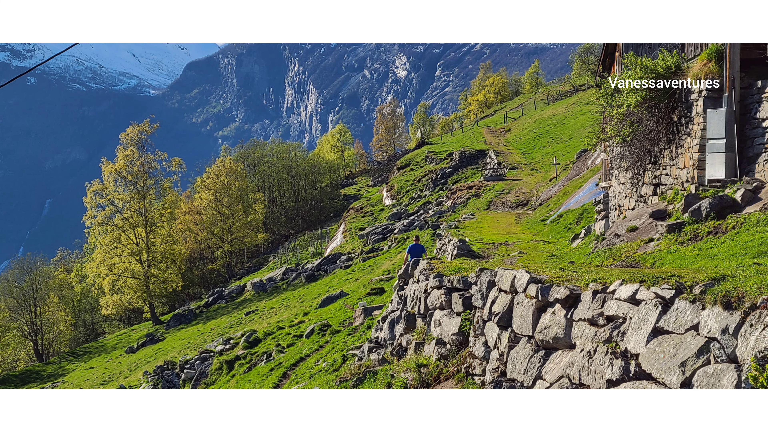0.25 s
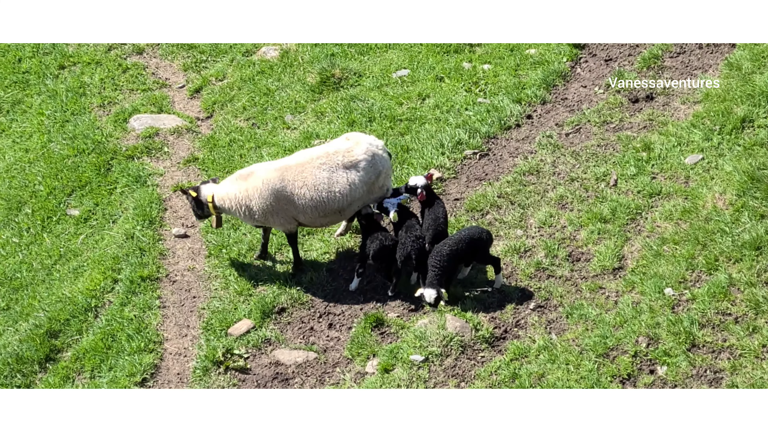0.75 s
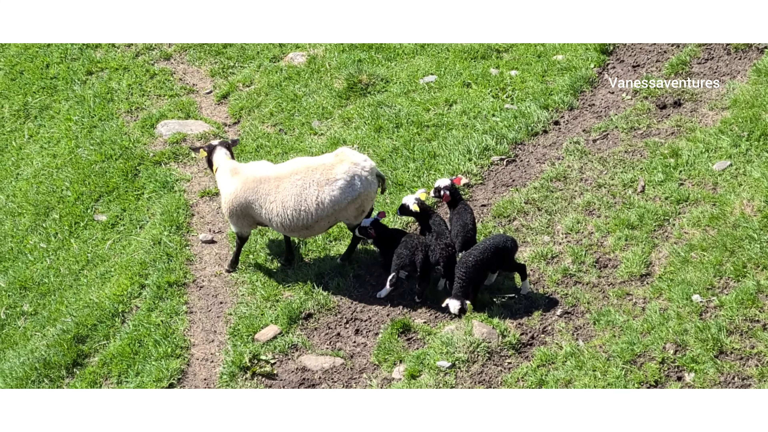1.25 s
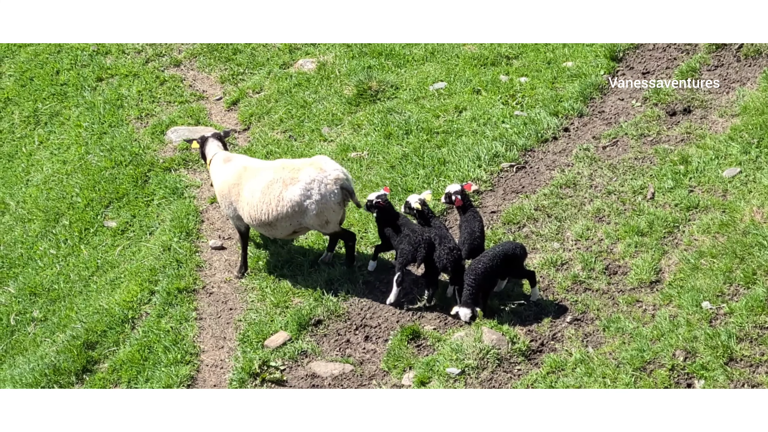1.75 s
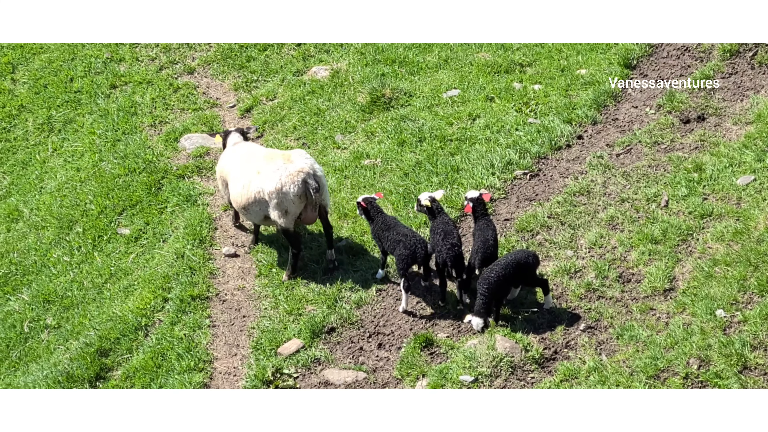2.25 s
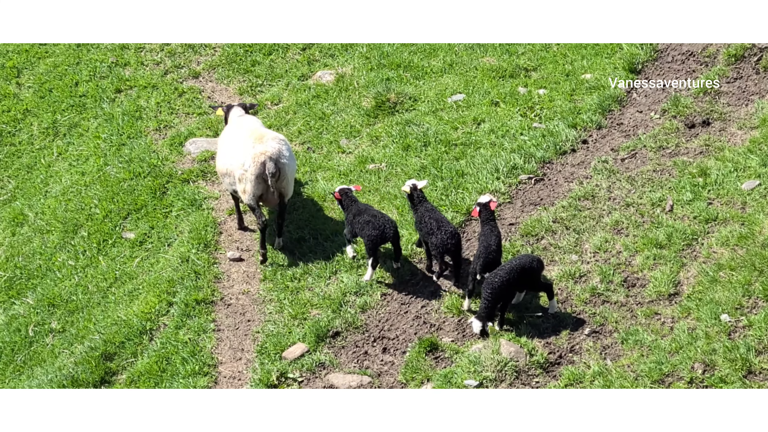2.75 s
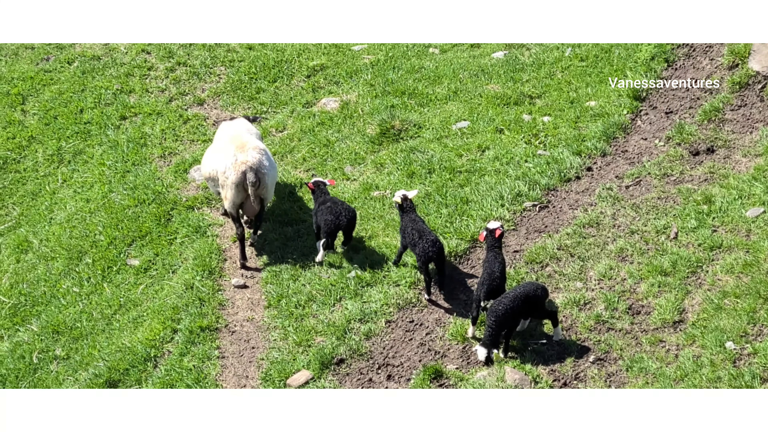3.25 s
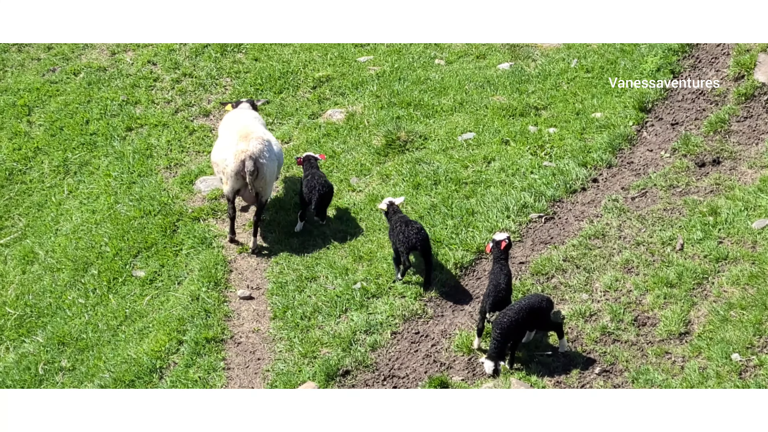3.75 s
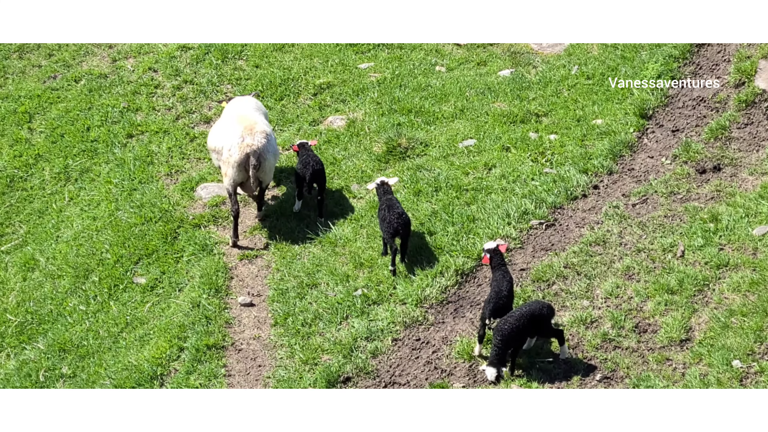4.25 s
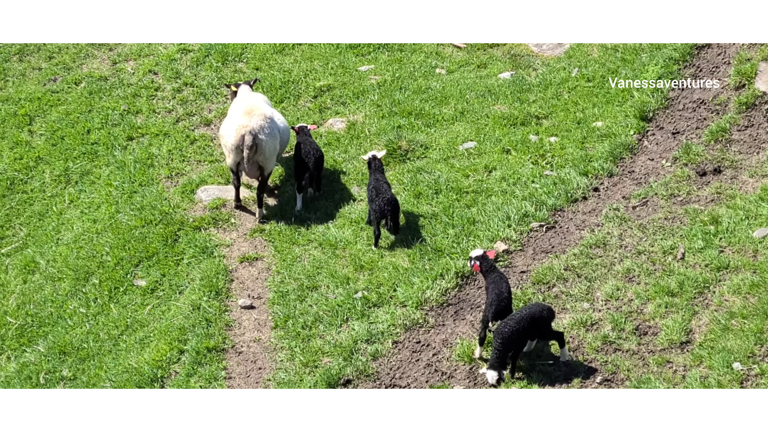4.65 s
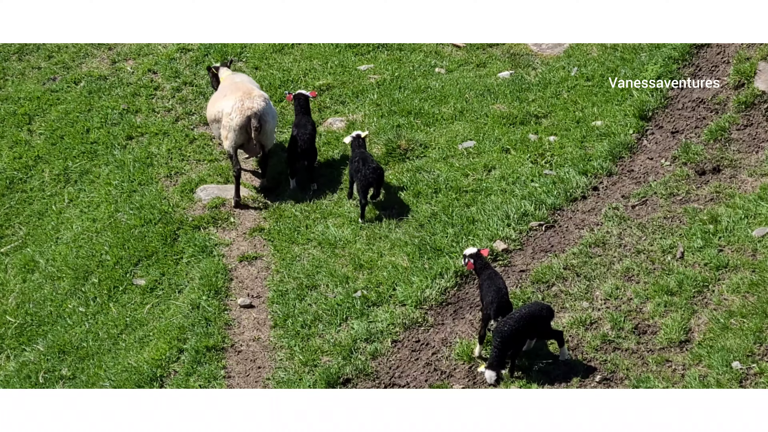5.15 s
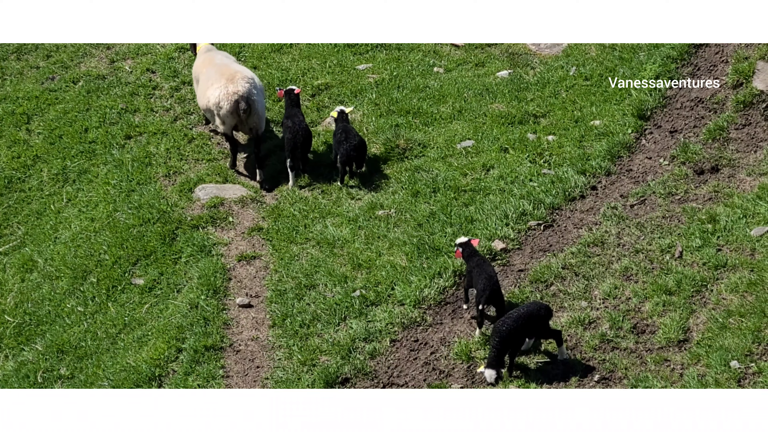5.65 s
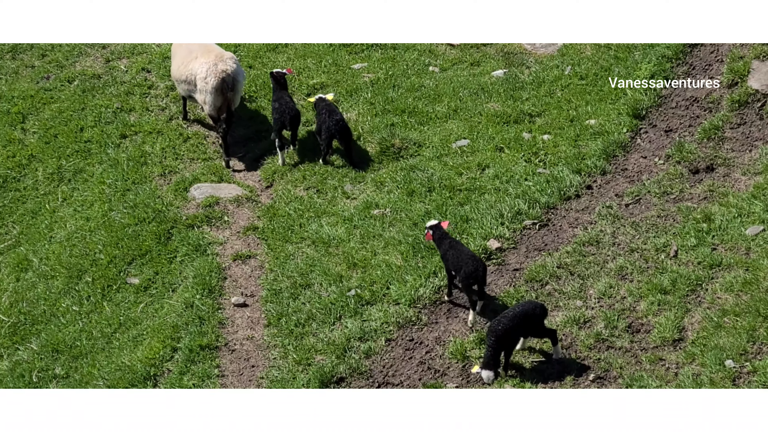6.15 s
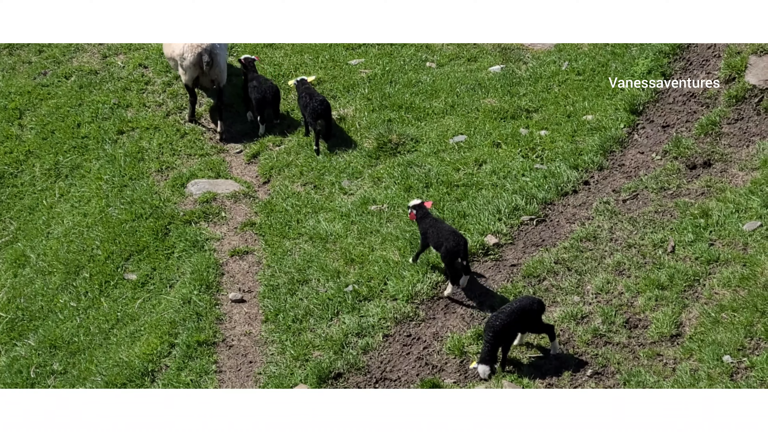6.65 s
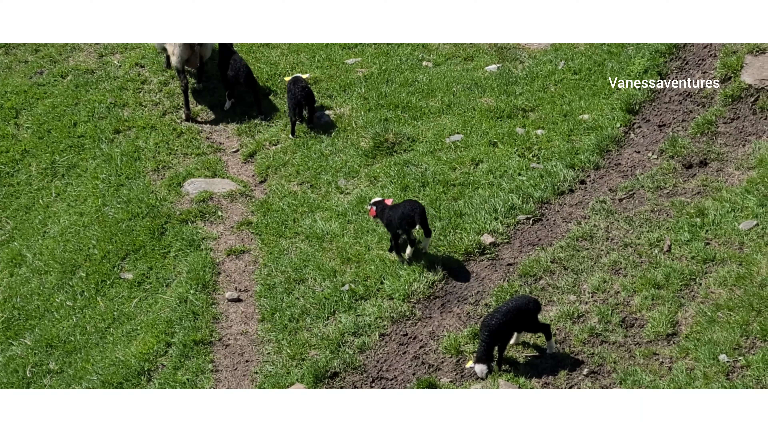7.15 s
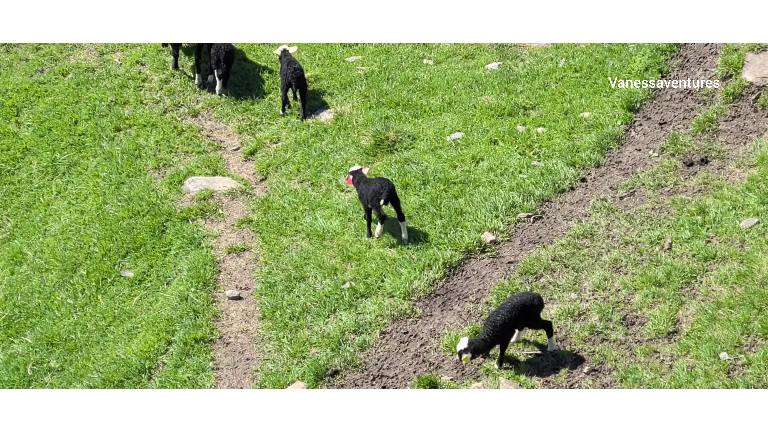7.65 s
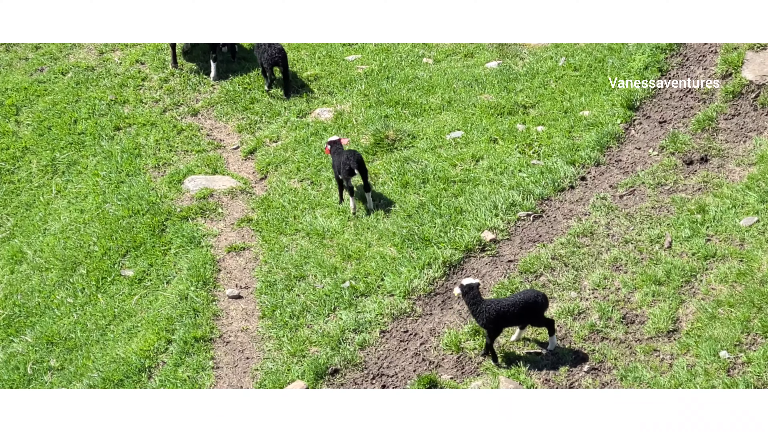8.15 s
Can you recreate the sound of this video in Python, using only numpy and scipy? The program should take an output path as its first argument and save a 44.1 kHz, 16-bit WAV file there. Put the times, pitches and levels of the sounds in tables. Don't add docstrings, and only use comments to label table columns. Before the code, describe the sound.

Nearly half a second of silence ends abruptly with a small pop, opening onto a hillside with a steady low valley roar, gentle wind rumble and faint hiss. Tiny grass snaps come first, then a ewe's damped metal bell clonks about every second, each knock short, hollow and differently coloured. A faint bird call and peeps pass midway. Stereo outdoor microphones, slightly buffeted by wind, no room echo.

```python
import sys
import numpy as np
from scipy import signal
from scipy.fft import rfft, irfft
from scipy.io import wavfile
from scipy.ndimage import uniform_filter1d

SR = 44100
rng = np.random.default_rng(int(sys.argv[2]) if len(sys.argv) > 2 else 0)


def amplitude_ratio(level_db):
    exponent = np.asarray(level_db, float) / 20
    return 10 ** exponent


def transcribe(u):
    v = np.clip(np.atleast_2d(u).T, -1, 1)
    q = np.round(v * 32767).astype(np.int16)
    wavfile.write(sys.argv[1], SR, q)


N = 370440

# (frequency_hz, lean_db)
HISS_SPECTRUM = [(2500, -25), (4200, -4), (4900, -7), (5600, -7), (6200, -.5), (7000, 0), (7500, -4),
                 (8200, -19), (9500, -20), (10600, -14), (12000, -11.5), (15300, -12.5), (15900, -22)]
HISS_LIKENESS = [(5500, 0.1), (6200, 0.8), (7600, 0), (8300, 0), (15000, 0)]
HISS_LEAN = [(5500, -2.7), (6250, -4.5), (6800, 15.5), (7600, -4.5), (9000, 9), (10400, 5.5), (11800, -8.5),
             (15200, 0)]
# (frequency_hz, lean_db)
ROAR_SPECTRUM = [(65, -38), (110, -8.5), (146, -6), (248, -1.5), (290, -8), (349, -3), (508, -8.5),
                 (763, -7.5), (1090, -15), (1400, -20.5), (2110, -21.5), (3110, -34.5), (4600, -48.5),
                 (5980, -61), (10100, -120)]
ROAR_LIKENESS = [(100, 1), (250, 0.9), (600, 0.5), (1400, 0.65), (1700, 1), (2300, 0.47), (3000, 0.5),
                 (3500, .05)]
ROAR_LEAN = [(100, -0.5), (500, -0.8), (1100, -0.7), (1800, -3), (3100, -3.5), (4200, 0)]
# (frequency_hz, density_db)
WIND_SPECTRUM = [(8, -35), (20, -11), (30, -4), (45, 0), (65, 0), (100, -4), (140, -13), (220, -28),
                 (500, -90)]
# (start_s, length_s, level_db, lean_db), positive lean to the left
GUSTS = [
    (.45, 2.1, -41, -2),
    (1.0, 2.11, -37.5, 6.5),
    (2.1, 0.55, -45, -2),
    (2.75, 0.79, -43.5, -12.5),
    (3.4, 0.51, -37.5, 8.5),
    (3.68, 0.59, -33, 7),
    (4.5, .5, -45.5, 1),
    (4.95, 0.26, -38.5, 9),
    (5.55, 0.47, -41, 1),
    (6.3, 0.46, -39.5, 5),
]
# (frequency_hz, density_db)
FOLIAGE_SPECTRUM = [(300, -87), (700, -37), (1000, 14), (1500, 4.5), (2000, 2), (2900, -16), (4000, -26.5),
                    (7000, -72)]
# (start_s, length_s, level_db)
LEAF_PUFFS = [
    (4.75, .52, -50.5),
    (5.62, 0.18, -42),
    (5.72, 0.33, -46),
    (7.38, 0.44, -51.5),
]
# (start_s, length_s,
# pitch_hz, level_db, lean_db)
PEEPS = [(3.31, .045, 3350, -66, 0), (3.44, .04, 3460, -65, 0), (3.48, .025, 3270, -65, 0),
         (3.6, .04, 3400, -67, 0), (3.445, .035, 9710, -74, -3), (6.505, .22, 2585, -59, 6),
         (6.86, .07, 5890, -70, -6), (7.0, .07, 5840, -71, -6), (5.67, .07, 1080, -50, 0),
         (1.83, .12, 2088, -60, 2), (8.23, .05, 2845, -66, 4)]
# (start_s, peak_db, centre_hz)
STEM_SNAPS = [(0.61, -47.5, 4590), (0.6988, -64, 3760), (0.832, -52, 3900), (0.9014, -49, 3530),
              (0.9807, -47, 6290), (1.1433, -50, 3520), (1.1794, -53, 3580), (2.2727, -65, 6930),
              (2.595, -62, 3520), (2.6299, -53, 6590), (2.8823, -54, 7030), (3.7394, -51, 3730),
              (4.353, -57, 3600), (5.4435, -54, 4350), (5.9409, -61, 7100), (6.4792, -62, 3820),
              (7.1457, -58, 6930), (8.2048, -54, 3920)]
# (start_s, length_s, level_db)
BLADE_SWISHES = [
    (.97, .025, -65),
    (1.066, 0.054, -66.5),
    (1.899, 0.12, -75),
    (2.35, 0.095, -68),
    (4.665, 0.044, -68),
    (4.703, 0.011, -52),
]
# (frequency_hz, density_db)
SWISH_SPECTRUM = [(800, -72), (3000, 0), (6500, -5), (8500, -20), (10500, -5), (15500, -8)]
# (start_s, hollow_note_db, wall_blow_db, place_along_0_1, height_0_1)
KNOCKS = [(1.5335, -25.8, -29.8, 0.494, 0.822), (1.6923, -36.6, -41.0, -0.017, 0.493),
          (2.125, -18.4, -34.5, 0.063, 0.199), (3.011, -17.5, -20.2, 0.431, 0.059),
          (3.892, -23.1, -25.9, 0.253, 0.689), (4.711, -18.1, -28.2, 0.299, 0.364),
          (4.866, -18.0, -33.6, 0.864, 0.806), (5.753, -16.4, -24.9, 0.775, 0.877),
          (5.87, -51.7, -52.1, 0.886, 0.149), (6.283, -30.5, -33.5, 0.347, 0.904),
          (6.671, -23.1, -41.1, 0.456, 0.436), (6.736, -51.2, -47.5, 0.057, 0.94),
          (7.173, -28.7, -49.7, 0.71, 0.876), (7.723, -21.2, -38.6, 0.993, 0.446),
          (7.866, -35.1, -48.5, 0.709, 0.953), (8.318, -21.1, -30.6, 0.641, 0.422)]
# (level_db, half_waves_along,
# start_along_half_waves, half_waves_up, start_up_half_waves)
WALL_PATTERNS = [(-9.96, 2.15, -0.19, 1.37, 0.5), (-5.93, 3.1, -0.42, 1.42, -0.56),
                 (-8.2, 1.35, -0.29, 2.93, 0.46), (-3.82, 2.79, -0.36, 1.46, 0.37),
                 (-8.18, 1.08, -0.39, 0.33, 0.34), (-12.63, 0.56, -0.07, 2.22, 0.44),
                 (-13.0, 0.0, 0.27, 2.83, -0.48), (-17.97, 1.61, 0.58, 0.6, 0.1),
                 (-17.32, 1.41, 0.66, 2.22, -0.38), (-13.23, 1.69, 0.11, 2.01, -0.5),
                 (-17.39, 3.68, 0.39, 1.9, -0.53), (-6.57, 0.05, -0.46, 1.58, -0.5),
                 (-21.99, 0.86, -0.51, 0.63, -0.28), (-13.95, 1.71, 0.05, 2.34, 0.35)]
# (frequency_hz, level_db, t60_s, lean_db, left_lead_rad)
LOW_MODES = [
    [(1208, 10.3, .084, 6, 1.01)],
    [(2087, 3, .35, 0, -2.9)],
    [(2568, 2.5, .19, -2, -1.5)],
    [(3010, 2, .17, -1, -2.2)],
    [(3175, -3, .12, -3, -.4), (3245, -4, .08, -2, -.8), (3467, -4, .07, 0, 1.1)],
]
MID_MODES = [
    [(4041, 3, .2, 5, 1.1)],
    [(4219, 2.6, .185, 6, -1.9)],
    [(4606, 2.5, .11, -1, -.2)],
    [(5127, 2.3, .195, -9, -2.5)],
    [(5275, 6.1, .245, -8, -3), (5500, -9, .12, -1, -2.7)],
]
HIGH_MODES = [
    [(11620, -6, .11, 2, .9), (12165, 0, .09, -3, 2.1), (13160, -5, .1, 0, .4), (13565, -5, .08, -4, -2.3),
     (14600, -7, .07, -2, -1.8), (15050, -8, .08, 0, -1.1), (15425, -8, .08, 4, -.3)],
    [(6677, 3, .13, -2, -2)],
    [(7025, 2, .13, 5, -1.4), (7296, -5, .14, 3, -1.4), (7612, -10, .2, 8, .4)],
    [(8620, -6, .1, 9, 2.1), (8932, -2, .08, 1, 1.6), (9278, 0, .1, 7, 2.4), (9690, -4, .09, 3, 2.3)],
    [(10004, 0, .12, 9, 2.8), (10400, -5, .1, 9, -1.6), (10680, -2, .08, 9, -.8), (10920, -2, .1, 3, -2.1),
     (11330, -6, .1, 2, -2)],
]
# (frequency_hz, density_db)
DULL_SCRAPE = [(900, -64.5), (2400, -13), (3250, 2.5), (3800, 1.5), (5200, -11), (6100, 7), (7100, -24),
               (8000, -17.5), (11000, -62.5)]
BRIGHT_SCRAPE = [(3000, -66), (6000, -31), (8000, -9), (11000, -2), (13500, 2), (15500, -4)]


def evened(x):
    return x / np.sqrt(np.mean(x ** 2) + 1e-20)


def read(points, hz):
    f, value = np.transpose(points)
    return np.interp(np.log(hz + 1), np.log(f + 1), value)


def sides(lean_db):
    return amplitude_ratio(np.array([lean_db / 2, -lean_db / 2]))


def add(mix, start_s, sound):
    part = mix[:, round(start_s * SR):][:, :sound.shape[1]]
    part += sound[:, :part.shape[1]]


def noise(spectrum, same, lean_db=0., lead_s=0., patchy_db=0.):
    frames, hz = N // 256 + 5, np.fft.rfftfreq(1024, 1 / SR)
    a, b, c, d, patches = rng.standard_normal((frames, 513, 5)).T
    patches = uniform_filter1d(patches, size=12, axis=0)
    patches = evened(uniform_filter1d(patches, size=14, axis=1))
    same, lean_db = (read(v, hz)[:, None] if np.ndim(v) else v for v in (same, lean_db))
    same = np.clip(same, 0, 1)
    left, own = a + 1j * b, c + 1j * d
    late = np.exp(-1j * (2 * np.pi * hz * lead_s - .45))[:, None]
    right = same * left * late + np.sqrt(1 - same ** 2) * own
    z = np.array([left * amplitude_ratio(lean_db / 2), right / amplitude_ratio(lean_db / 2)])
    z *= amplitude_ratio(read(spectrum, hz)[:, None] + patchy_db * patches)
    return evened(signal.istft(z, nperseg=1024, noverlap=768)[1][:, :N])


def puffs(rows, edge):
    power = np.zeros((2, N))
    for start_s, length_s, db, *lean_db in rows:
        gains = amplitude_ratio(db) * sides(sum(lean_db))[:, None]
        add(power, start_s, gains ** 2 * signal.windows.tukey(round(length_s * SR), edge))
    return power


def microphone_hiss():
    return amplitude_ratio(-72.5) * noise(HISS_SPECTRUM, HISS_LIKENESS, HISS_LEAN, patchy_db=.4)


def valley_roar():
    return amplitude_ratio(-41) * noise(ROAR_SPECTRUM, ROAR_LIKENESS, ROAR_LEAN, lead_s=.00045, patchy_db=.5)


def wind():
    hz = np.fft.rfftfreq(N, 1 / SR)
    raw = rng.standard_normal((3, N))
    rumble = irfft(rfft(raw[:2] + 0.41 * raw[2]) * amplitude_ratio(read(WIND_SPECTRUM, hz)), N)
    power = uniform_filter1d(uniform_filter1d(rumble ** 2, size=5000), size=5000)
    rumble /= np.sqrt(power)
    centre_hz, half_width_hz = 87.5, 2.5
    drone = evened(irfft(rfft(raw[2]) / (1 + ((hz - centre_hz) / half_width_hz) ** 2), N))
    calm_db, fall_db_per_s = -40, 0.67
    calm = amplitude_ratio(calm_db - fall_db_per_s * np.arange(N) / SR)
    return np.sqrt(calm ** 2 + puffs(GUSTS, edge=0.51)) * rumble + amplitude_ratio(-49.0) * drone


def foliage():
    level = np.sqrt(amplitude_ratio(-53) ** 2 + puffs(LEAF_PUFFS, edge=.6))
    return level * noise(FOLIAGE_SPECTRUM, .6, -1.5, lead_s=.0004, patchy_db=2)


def whistle(hz, db, lean_db, waver, blur_hz):
    flutter, drift = evened(uniform_filter1d(rng.standard_normal((2, 2, len(hz))), size=150))
    turn = 2 * np.pi * np.cumsum(hz + blur_hz * drift, axis=1) / SR
    return sides(lean_db)[:, None] * (1 + waver * flutter) * amplitude_ratio(db) * np.sin(turn)


def birds():
    out = np.zeros((2, N))
    start_s, length_s, call_db = 3.445, .145, -68.5
    call_hz, sag_hz_per_s = 6200, 5500
    rise_hz, rise_s, drop_hz, drop_s = 1700, .012, 2000, .02
    warble_hz, warble_per_s, warble_from_s, warble_s = 400, 59, .006, .048
    t = np.arange(0, length_s, 1 / SR)
    rise, drop = np.exp(-t / rise_s), np.exp((t - length_s) / drop_s)
    warble = warble_hz * np.sin(2 * np.pi * warble_per_s * (t - warble_from_s))
    warble *= np.exp(-(t / warble_s) ** 6)
    hz = call_hz - sag_hz_per_s * t - rise_hz * rise - drop_hz * drop + warble
    db = call_db - 10 * (rise ** 3 + drop ** 2)
    add(out, start_s, whistle(hz, db, lean_db=-4, waver=.5, blur_hz=150))
    for start_s, length_s, hz, db, lean_db in PEEPS:
        count = round(length_s * SR)
        peep = whistle(np.full(count, hz), db, lean_db, waver=.3, blur_hz=32)
        add(out, start_s, peep * signal.windows.tukey(count, .3))
    return out


def grass():
    out, t = np.zeros((2, N)), np.arange(400) / SR
    bursts = rng.standard_normal((len(STEM_SNAPS), 2, len(t)))
    for (start_s, db, hz), burst in zip(STEM_SNAPS, bursts):
        crack = signal.lfilter([1, -1], [1], burst) * .5 + 1.15 * np.sin(2 * np.pi * hz * t)
        fade = amplitude_ratio(db - 10.5 - 60 * t / 0.022)
        add(out, start_s, crack * fade * np.minimum(t / .0004, 1))
    brush = np.zeros((2, N))
    for start_s, length_s, db in BLADE_SWISHES:
        stroke = amplitude_ratio(db) * signal.windows.tukey(round(length_s * SR), .6)
        add(brush, start_s, stroke * np.ones((2, 1)))
    crackle = amplitude_ratio(1.9 * evened(uniform_filter1d(rng.standard_normal(N), size=60)))
    return out + brush * crackle * noise(SWISH_SPECTRUM, 0.22)


def ground(x, length_s, db):
    t = np.arange(round(length_s * SR)) / SR
    taps = rng.standard_normal((2, len(t)))
    taps *= (rng.random((2, len(t))) < .03) * amplitude_ratio(-30 * t / length_s)
    taps /= np.linalg.norm(taps, axis=1, keepdims=True)
    return x + amplitude_ratio(db) * signal.oaconvolve(x, taps, axes=1)[:, :N]


def struck_levels():
    start_s, hollow_db, blow_db, along, up = np.transpose(KNOCKS)[:, :, None]
    db, waves_along, start_along, waves_up, start_up = np.transpose(WALL_PATTERNS)
    shape = np.cos(np.pi * (waves_along * along + start_along))
    shape = shape * np.cos(np.pi * (waves_up * up + start_up))
    wall_db = blow_db + db + 10 * np.log10(shape ** 2 + .001)
    levels = np.hstack([hollow_db, wall_db])
    return [np.hstack([start_s, families]) for families in np.split(levels, 3, axis=1)]


def minor_modes(low_hz, high_hz, db, t60, count):
    place, life, lean, lead = rng.random((count, 4)).T
    hz = low_hz + (high_hz - low_hz) * (np.arange(count) + place) / count
    return [(f, db, t60 * (.5 + u), 12 * (v - .5), 2 * np.pi * w) for f, u, v, w in zip(hz, life, lean, lead)]


def ring(knocks, families, rise_s, spread_db, detune):
    out, t = np.zeros((2, N)), np.arange(SR // 4) / SR
    chance = rng.standard_normal((len(knocks), 30, 3))
    for (start_s, *levels), luck in zip(knocks, chance):
        modes = []
        for level, rise, family in zip(levels, rise_s, families):
            modes += [(level, rise, len(family) > 1, *mode) for mode in family]
        sound = np.zeros((2, len(t)))
        for (level, rise, shared, hz, db, t60, lean_db, lead), (u, v, w) in zip(modes, luck):
            fade = amplitude_ratio(level + db + shared * spread_db * u - 60 * t / t60)
            fade *= (1 - np.exp(-t / rise)) ** 2
            turn = 2 * np.pi * hz * (1 + detune * v) * t + 3 * w
            sound += sides(lean_db)[:, None] * fade * np.cos(turn + np.array([[lead], [0]]))
        add(out, start_s - .002, sound)
    return out


def scrape_envelope(knocks, column, db, t60):
    t, shape = np.arange(N) / SR, np.zeros(N)
    for row in knocks:
        since = np.maximum(t - row[0], 0)
        shape += amplitude_ratio(row[column] + db - 60 * since / t60) * np.minimum(since / 0.0016, 1)
    return shape


def bell():
    lows, mids, highs = struck_levels()
    low_rise_s = [0.0057, 0.0012, 0.0048, .0015, 0.00035]
    low = ring(lows, LOW_MODES, low_rise_s, spread_db=-2, detune=.0012)
    middle = ring(mids, MID_MODES, [.002] * 5, spread_db=2, detune=.0003)
    high = ring(highs, HIGH_MODES, [.0025] * 5, spread_db=4, detune=.0003)
    crowd = [minor_modes(3200, 7900, db=-18, t60=.09, count=12),
             minor_modes(7900, 15600, db=-8.5, t60=.07, count=18)]
    blows = [(lo[0], lo[5], hi[1]) for lo, hi in zip(lows, highs)]
    minor = ring(blows, crowd, [.002, .0025], spread_db=6, detune=.001)
    mid_scrape = noise(DULL_SCRAPE, 0.27) * scrape_envelope(lows, column=5, db=-12, t60=0.098)
    top_scrape = noise(BRIGHT_SCRAPE, 0.) * scrape_envelope(highs, column=1, db=-11, t60=.065)
    treble = ground(high + minor + top_scrape, length_s=.06, db=-8)
    return low + amplitude_ratio(-2) * middle + mid_scrape + amplitude_ratio(-.8) * treble


def scene():
    background = microphone_hiss() + valley_roar() + wind() + foliage()
    return background + birds() + grass() + bell()


def low_pass(x):
    return signal.sosfilt(signal.butter(12, 17000, fs=SR, output="sos"), x)


def record(dry):
    since = np.arange(N) / SR - .4336
    pop = .022 * np.exp(-abs(since) / .0006)
    limited = signal.oaconvolve(dry, signal.firwin(401, 15800, fs=SR)[None], "same")
    opened = limited * np.clip(since / 0.0025, 0, 1)
    return low_pass((opened + pop) * (since >= 0))


dry = scene()
out = record(dry)
transcribe(out)
```